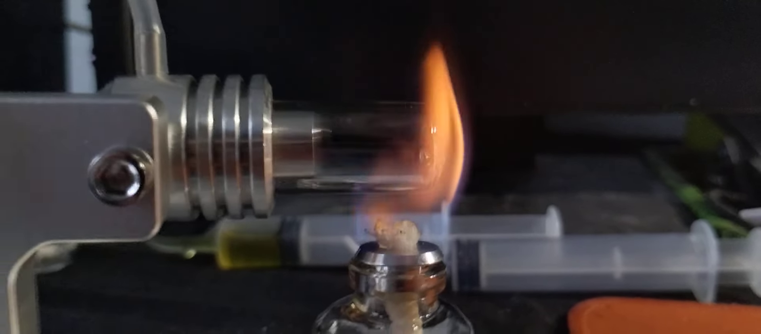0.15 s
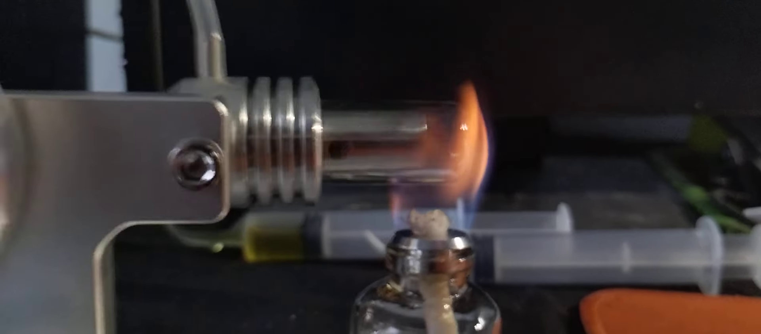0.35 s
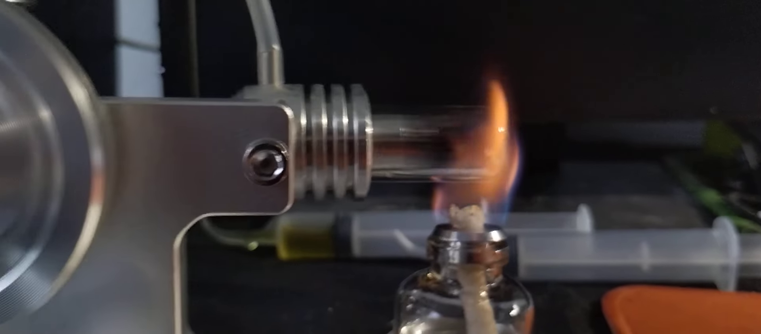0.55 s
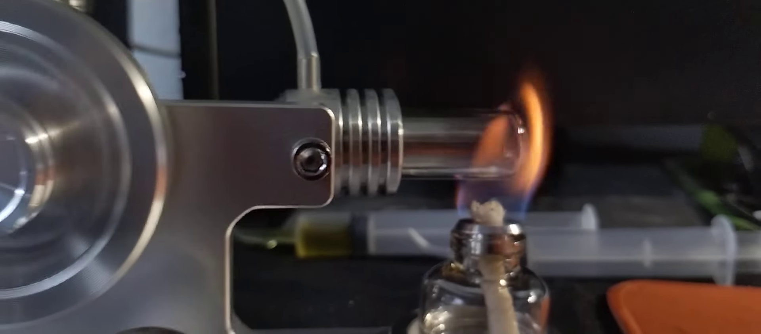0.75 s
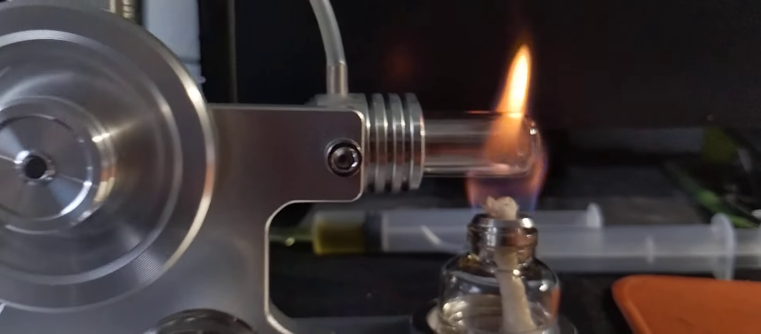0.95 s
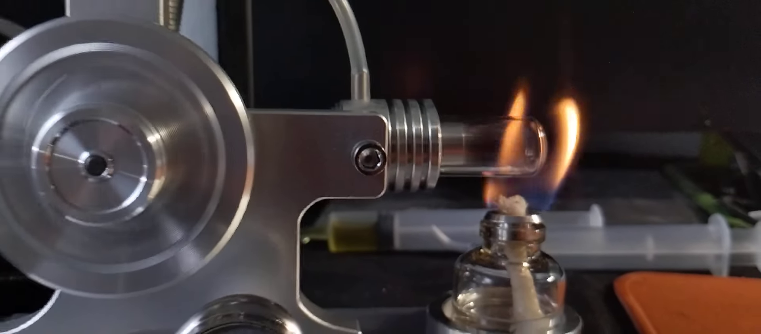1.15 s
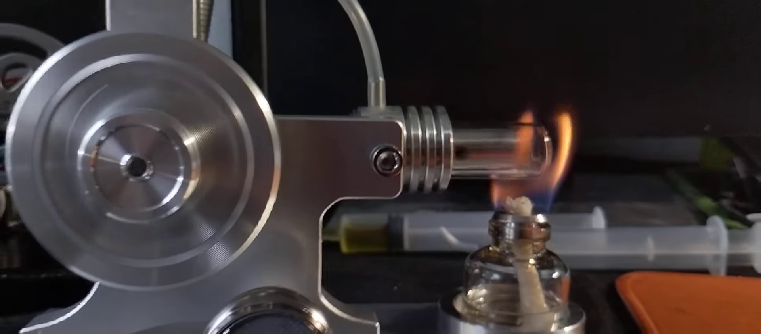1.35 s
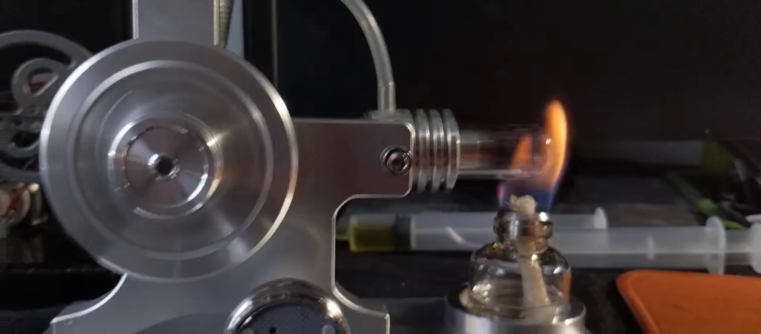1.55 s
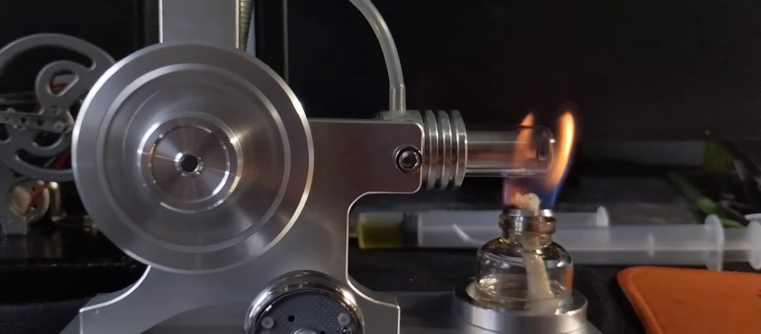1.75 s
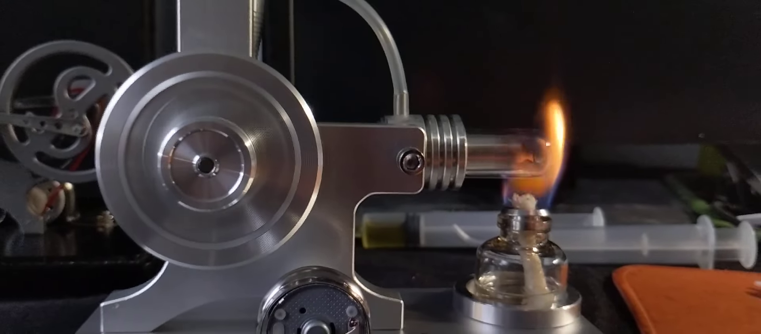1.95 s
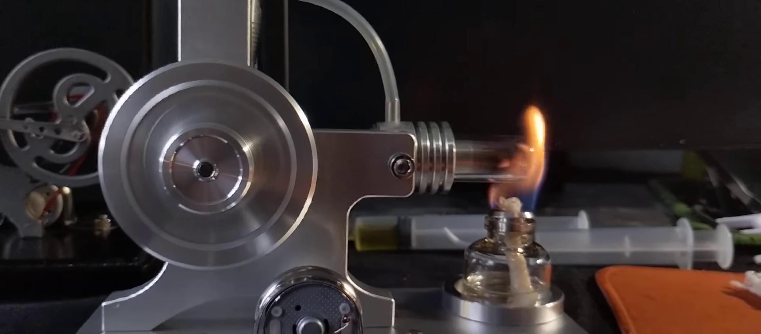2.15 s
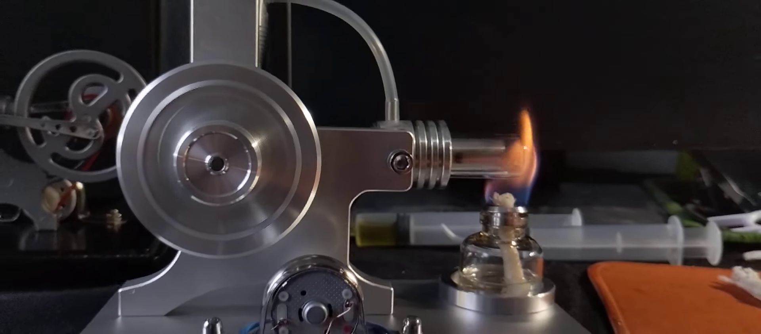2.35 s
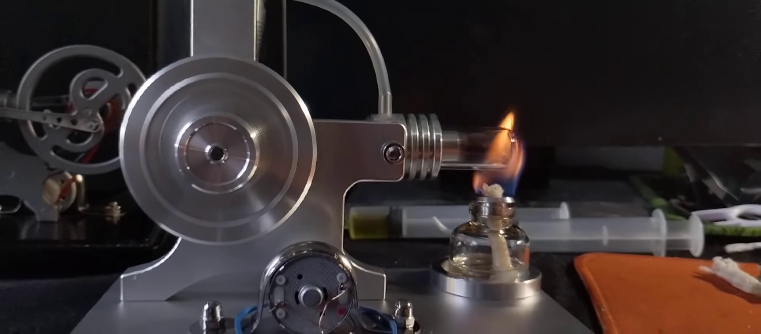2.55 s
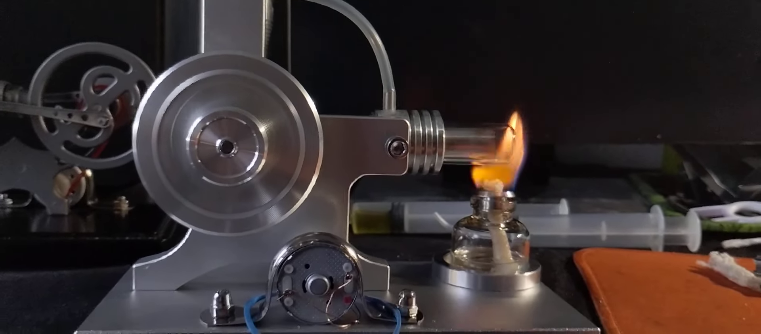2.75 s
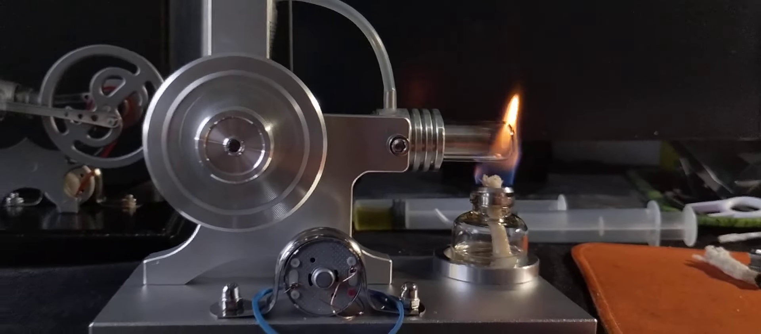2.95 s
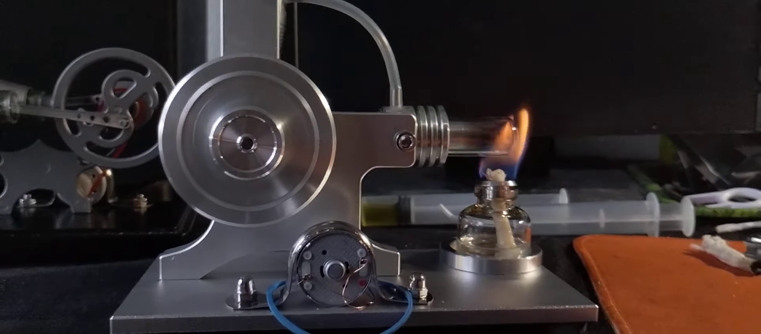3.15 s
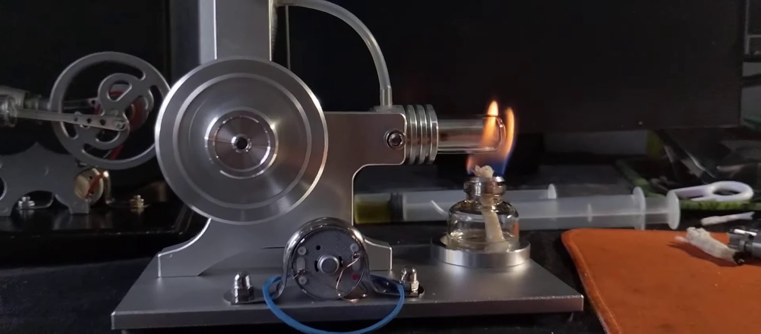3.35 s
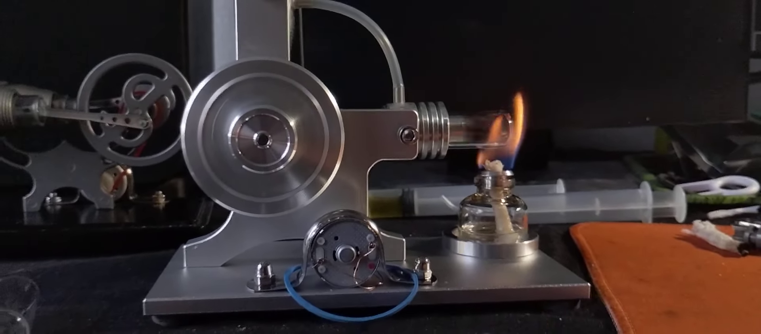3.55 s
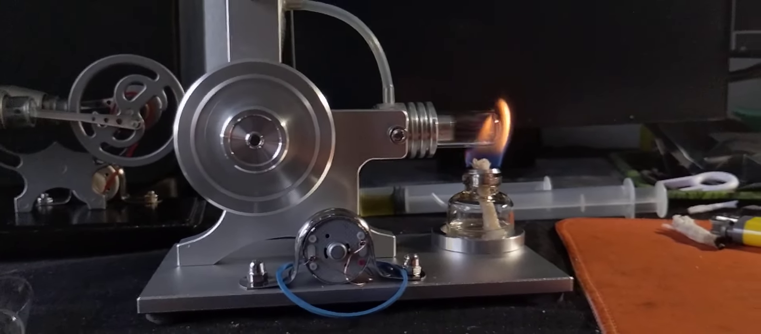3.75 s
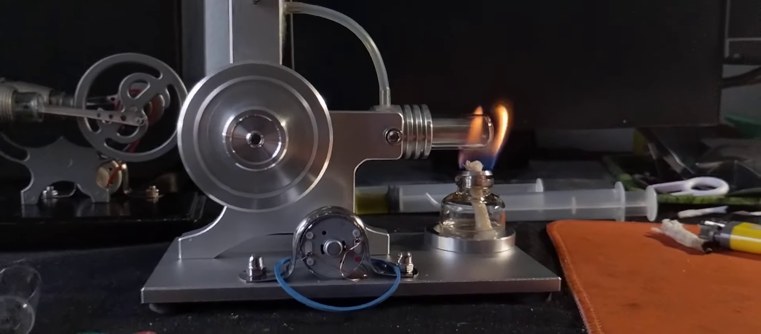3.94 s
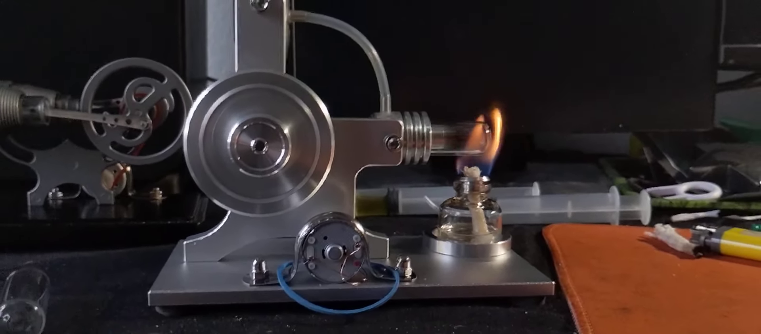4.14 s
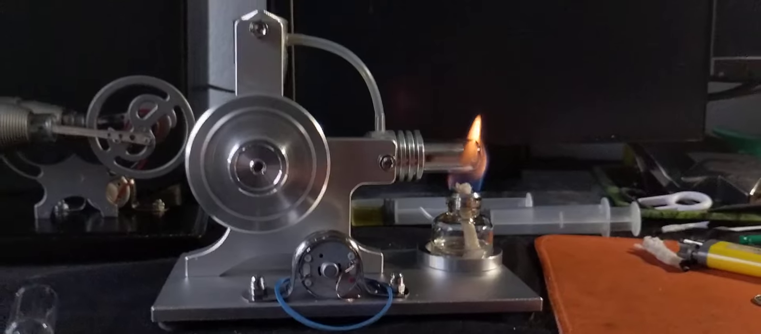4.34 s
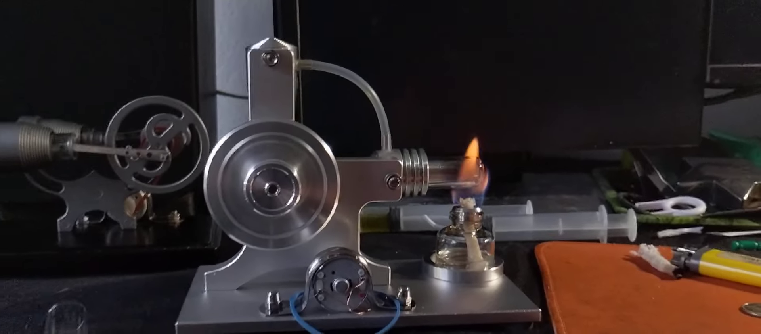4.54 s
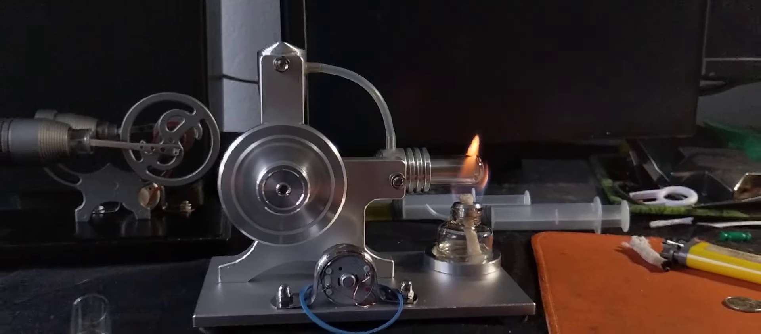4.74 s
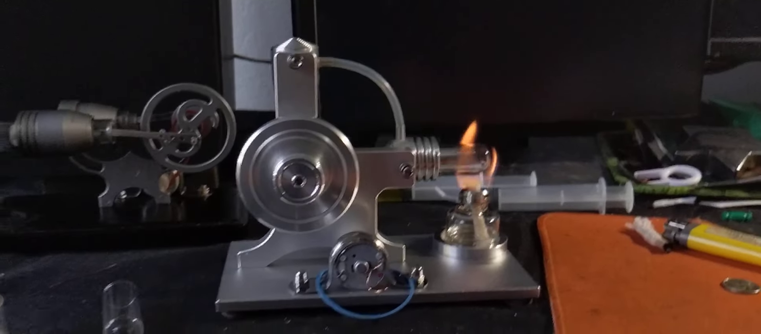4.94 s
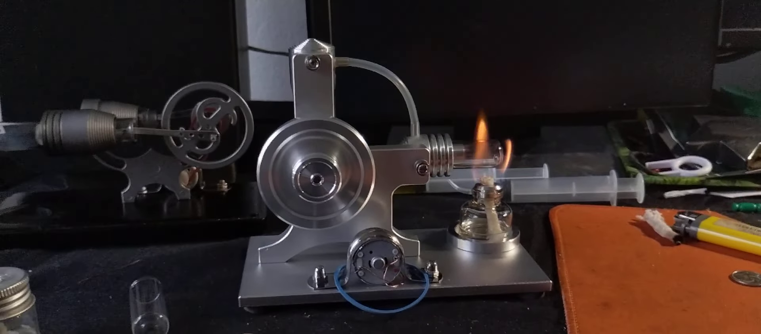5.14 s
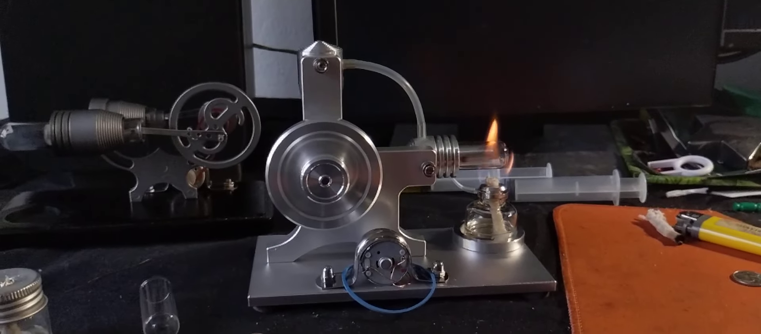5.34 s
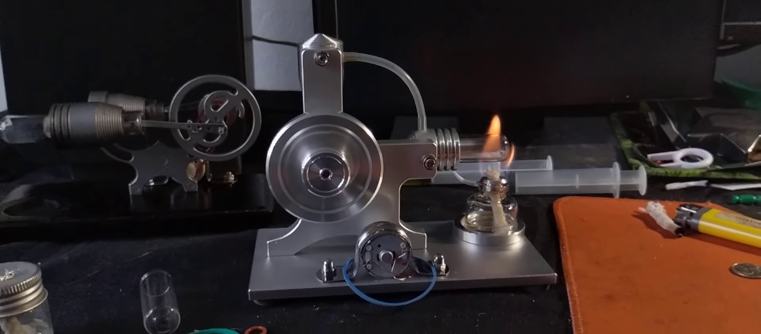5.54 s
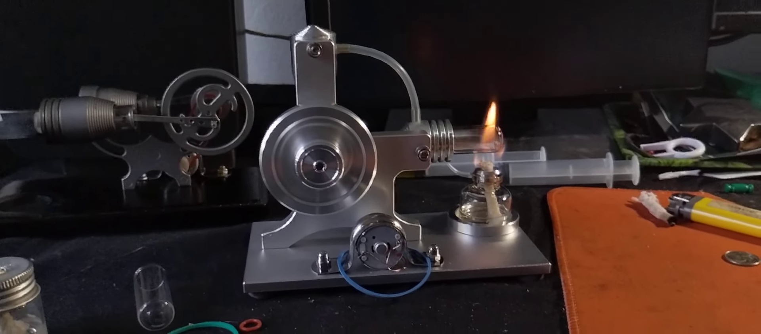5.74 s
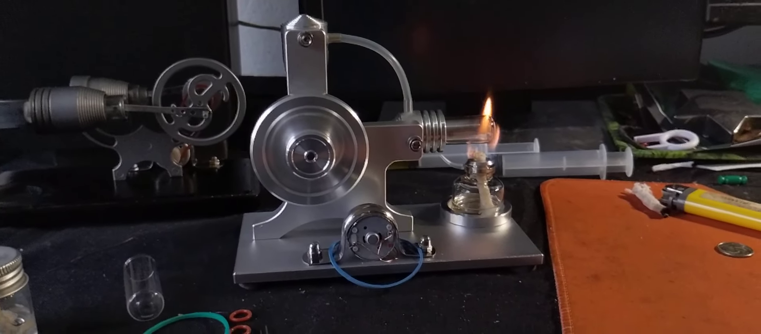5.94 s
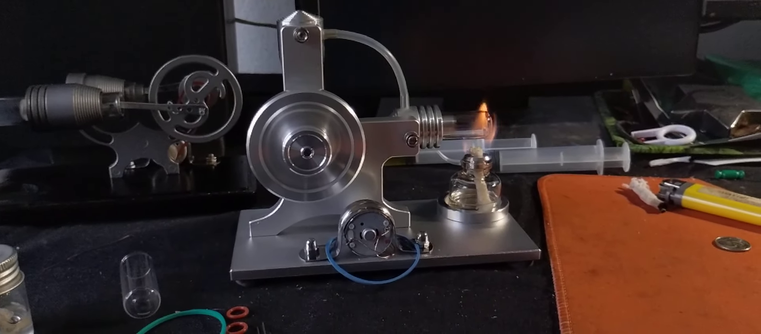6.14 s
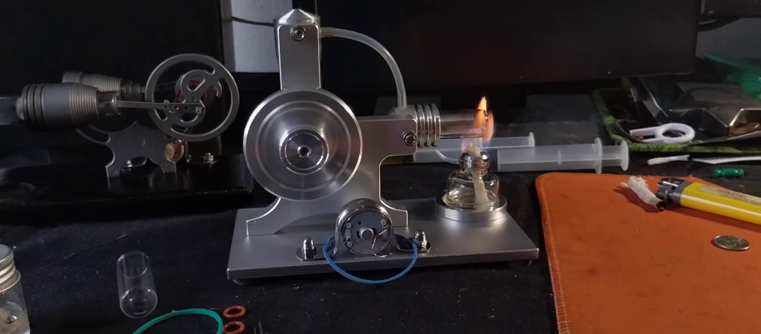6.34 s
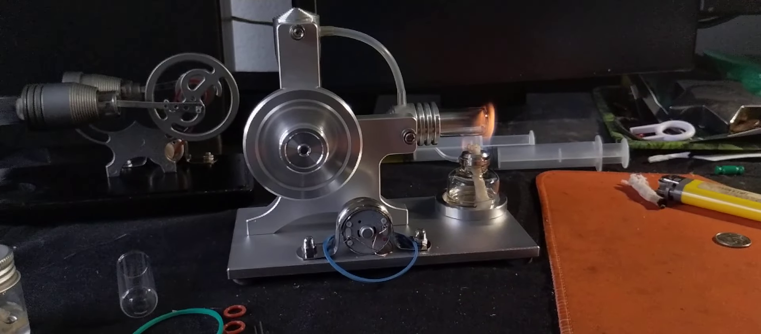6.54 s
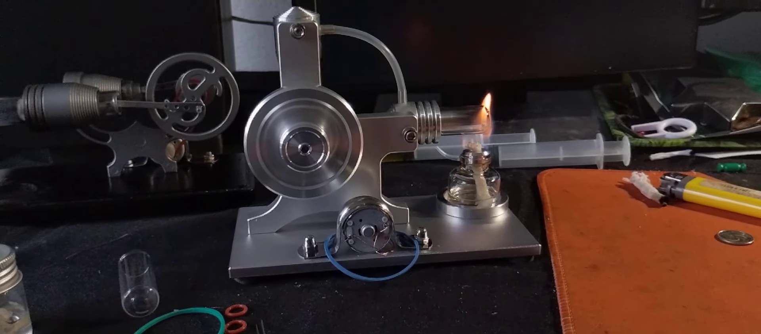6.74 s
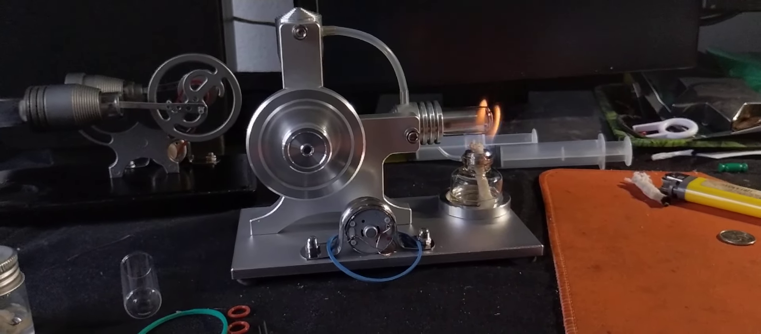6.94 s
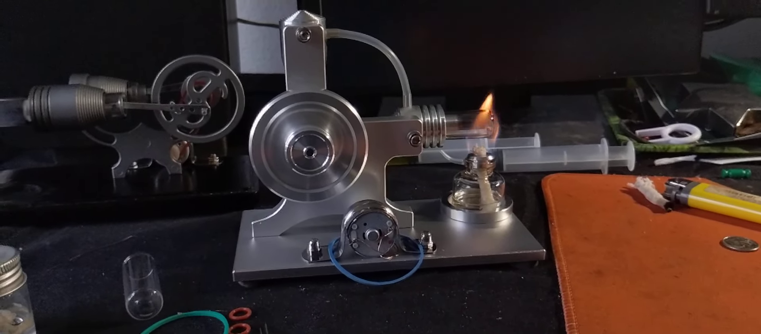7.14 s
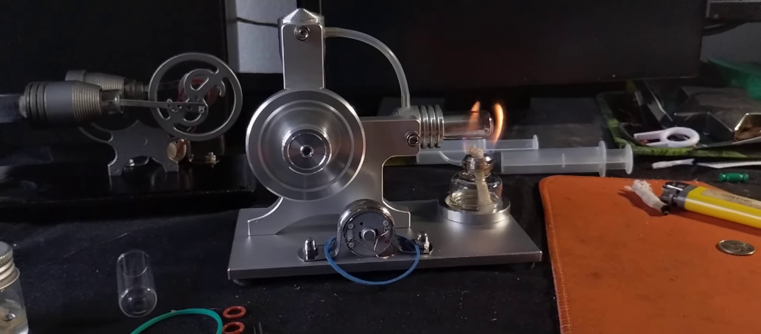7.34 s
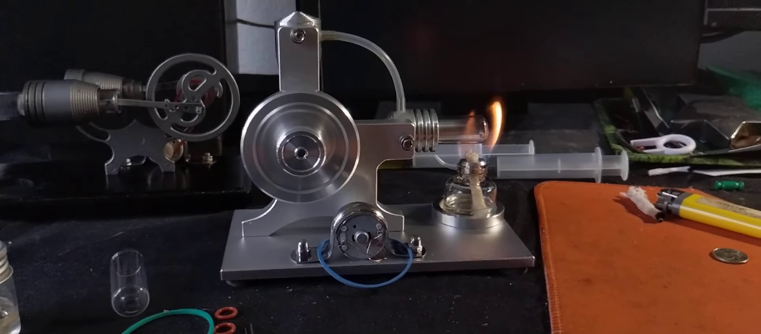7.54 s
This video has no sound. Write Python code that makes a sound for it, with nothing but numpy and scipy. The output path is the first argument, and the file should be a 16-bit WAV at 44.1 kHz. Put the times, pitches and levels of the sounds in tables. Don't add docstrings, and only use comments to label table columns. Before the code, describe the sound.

From 0 s a small metal hot-air engine is already spinning at full speed, close to a handheld stereo phone. Eighteen turns a second, with four tiny knocks each turn, merge into a dense, gritty rattling whir, bright and metallic, with slight unevenness and harder ticks. Flywheel, rods and frame ring in the treble, with fizz on top and a low hum and table rumble below. As the phone backs away, ringing tones shift in colour; a very high whistle swells on the left from about 1.3 to 2.2 s, then drops. Through 3-4.5 s the whole engine gets softer, and the whistle nearly vanishes around 4.7 s. From 5.5 s some shrill ringing returns modestly while the pace stays practically steady, very slightly quickening. The right side remains duller. A short room echo and faint hiss surround it; it is still running when it cuts off near 7.6 s.

```python
import sys
import numpy as np
from scipy import signal
from scipy.fft import rfft, irfft
from scipy.io import wavfile
from scipy.ndimage import uniform_filter1d, map_coordinates

SR = 44100
rng = np.random.default_rng(int(sys.argv[2]) if len(sys.argv) > 2 else 0)


def store_pcm(level_fs):
    pcm = np.round(np.clip(level_fs, -1, 1) * 32767).astype(np.int16)
    wavfile.write(sys.argv[1], SR, np.atleast_2d(pcm).T)


def volts(x):
    e = np.asarray(x, float) / 20
    return 10 ** e


N = 334719
T = np.arange(N) / SR
TURNS_PER_S = 18


def unit(x):
    return x / np.sqrt(np.mean(x ** 2) + 1e-20)


def along(points, hz):
    f, v = np.transpose(points)
    return np.interp(np.log(hz + 1), np.log(f + 1), v)


def curves(rows):
    s, *cols = np.transpose(rows)
    return [np.interp(T, s, c) for c in cols]


def wobble(rate):
    coarse = T[::64]
    knots = rng.standard_normal(int(N * rate / SR) + 4)
    return np.interp(T, coarse, map_coordinates(knots, [coarse * rate]))


def coloured(x, points):
    gain = volts(along(points, np.fft.rfftfreq(4096, 1 / SR)))
    cepstrum = irfft(np.log(gain))
    cepstrum[1:2048] *= 2
    cepstrum[2049:] = 0
    return signal.fftconvolve(x, irfft(np.exp(rfft(cepstrum))))[:N]


# start_s [s], lag [turns]
CRANK_LAG = [
    (0, -0.025),
    (0.25, 0.0),
    (2.25, 0.097),
    (2.9, 0.088),
    (4.25, 0.01),
    (5.25, -0.02),
    (5.75, -0.045),
    (6.25, -0.088),
    (7.6, -0.185),
]


def crank():
    return TURNS_PER_S * T - curves(CRANK_LAG)[0]


# crank_angle [turns], blow_db [dB], chatter_db [dB], chatter_t60_s [s]
KNOCKS = [
    (0.96, -0.5, -22, 0.07),
    (.262, -1, -34.5, 0.038),
    (.553, -2.5, -22.5, 0.032),
    (.772, -2.5, -33, 0.041),
]
# start_s [s], level_db [dB]
UNEVEN_KNOCKS = [(0.515, 7), (0.599, 6), (1.089, -8), (1.28, 5), (1.367, 5), (1.535, 5), (1.591, 5),
                 (1.769, 10), (1.868, 5), (1.892, 3), (2.147, 5), (1.98, 6), (2.019, 7), (2.103, 12),
                 (2.227, 7), (2.631, 7), (2.671, -8), (2.936, 6), (3.114, -8), (3.811, 8), (5.331, -7),
                 (5.486, -15), (5.596, 6), (5.695, 5), (5.818, -8), (6.051, -10), (6.327, 6), (6.752, -9),
                 (2.892, -3), (7.157, 8)]


def reversals(scatter_db, jitter_s, spiky_db, rub_db):
    forces, sizes_db, ages = [], [], []
    uneven_s, uneven_db = np.transpose(UNEVEN_KNOCKS)
    at = np.round(uneven_s * SR).astype(int)
    for angle, blow_db, chatter_db, t60 in KNOCKS:
        turns = crank() + 1 - angle
        turn = turns.astype(int)
        luck = rng.standard_normal((turn.max() + 2, 4))

        size_db = 1.45 * luck[:, 3]
        mine = np.abs(turns[at] - np.round(turns[at])) < .06
        size_db[np.round(turns[at[mine]]).astype(int)] = uneven_db[mine]

        since = (turns - turn) / TURNS_PER_S - jitter_s * np.abs(luck[turn, 0])
        blow = np.diff(since > 0, prepend=True) & (since > 0) & (since < .002)
        chatter = volts(chatter_db + scatter_db * luck[turn, 1] - 60 * since / t60) * (since > 0)
        spikes = uniform_filter1d(rng.standard_normal(N), size=25) * 5
        grit = unit(rng.standard_normal(N) * volts(spiky_db * spikes))
        knock = volts(blow_db + scatter_db * luck[turn, 2]) * blow + chatter * grit
        forces.append(knock + volts(rub_db) * grit)
        sizes_db.append(size_db[turn])
        ages.append(np.abs(since))
    return np.array(forces), np.array(sizes_db), np.array(ages)


def ring(force, modes):
    out = np.zeros((2, N))
    for hz, width_hz, *dbs in modes:
        pole = np.exp((2j * hz - width_hz) * np.pi / SR)
        push = volts(np.array(dbs)) @ force
        swing = signal.lfilter([width_hz ** 1.5], [1, -2 * pole, pole ** 2], push)
        lead = rng.choice([-1, 1]) * np.pi / 2 + .9 * wobble(22)
        out += [swing.imag, (swing * np.exp(1j * lead)).imag]
    return out / out.std(axis=1, keepdims=True)


# start_s [s], distance_loss_db [dB]
RETREAT = [(0, -1), (0.5, -2.5), (1, -4), (2, -6.5), (2.6, -7), (3.5, -10), (4.6, -13), (5.5, -14),
           (6.5, -13.5), (7.2, -13), (7.59, -12)]
HEARD = {"wheel low": (-52, -0.79, -44.5, 0.45), "wheel mid": (-31.5, 1.14, -47, 0.13),
         "wheel high": (-25.5, 1.08, -49, -0.6), "rod low": (-28.5, 0.69, -44, 0.63),
         "rod high": (-35, 2.2, -52.5, 0.4), "link low": (-40.5, 0.5, -47.5, 0.3),
         "link high": (-31.5, 1.5, -41, 0.33), "link top": (-60, 2, -59, -0.3),
         "link pin": (-42, .7, -53, .25), "link cap": (-52, .15, -64, .1), "edge": (-11, 1.3, -10, -1.5),
         "neck": (-11, 1, -17, .9), "shoulder": (-13.5, -0.5, -15, 1), "frame": (-26, 1.1049, -36, .6),
         "fizz": (-27, 1.4, -28, 1.2), "hum": (-35.5, 1.62, -48, 0.86), "rumble": (-40.5, .85, -41, .85)}
# part, centre_s [s], half_width_s [s], left_db [dB], right_db [dB]
BEAMS = [("wheel low", 1.62, 0.25, -30, 3.5), ("wheel low", 2, 0.27, -20, -12),
         ("wheel low", 3.86, 0.38, -9.5, -5), ("wheel low", 4.54, 0.36, 2.4, 4),
         ("wheel low", 5.74, 0.41, 3.9, 6), ("wheel low", 7.1, 0.45, 2.2, .1),
         ("wheel mid", 0, 0.31, 9.5, -2.2), ("wheel mid", .9, 0.31, .1, 8),
         ("wheel mid", 3.23, 1.6, 3.6, 12.2), ("wheel mid", 4.57, 0.14, 2.7, 3.6),
         ("wheel mid", 5.88, 0.42, 3.5, 6.2), ("wheel high", 0.2, 0.37, 5.2, -1.3),
         ("wheel high", 1.96, 0.41, -10, .1), ("wheel high", 2.6, 0.8, 2.4, 4.7),
         ("wheel high", 4.95, 0.56, -2.5, -22), ("wheel high", 7.15, 0.37, 4.6, 1.1),
         ("rod low", .35, .45, -4, -4), ("rod low", 1.78, 0.86, 7.1, 11.3),
              ("rod low", 2.7, 0.63, 2.7, 12), ("rod low", 5.28, 0.27, 4.4, 7.9),
              ("rod low", 7.1, 0.58, 2.2, .1), ("rod high", 0.75, 0.46, 15.7, 13.4),
              ("rod high", 1.5, 0.42, .1, 12), ("rod high", 7.4, 0.62, 16, 5.8),
              ("link top", 5.9, 2.1, 14, 12), ("link pin", 2.9, 1, 7, 9), ("link cap", 6.6, 1.3, 10, 6),
              ("shoulder", 6.3, 1.1, 4.5, 6), ("rod high", 5.6, .6, -3, .1), ("link high", 6, 1.24, -4, -7),
              ("link low", 2.85, 0.87, -6, -2), ("link high", 3.35, 1.3, 5.6, 5.1),
              ("frame", 3.9, 1, 0.63, 2.1), ("neck", 0.56, 0.51, 8.7, .1), ("fizz", 0, 0.26, -4.5, 0),
              ("fizz", 4.5, 0.66, 4, 0), ("fizz", 7, 0.2, -2, 0), ("hum", 1.6, 1.3, 2.2, 1.5),
              ("rumble", .7, 0.3, 6, 0), ("rumble", 4.25, .55, 2.3, 0)]


def heard(part):
    left_db, left_share, right_db, right_share = HEARD[part]
    loss_db = np.outer([left_share, right_share], curves(RETREAT)[0])
    level_db = np.array([[left_db], [right_db]]) + loss_db
    for name, s, width_s, *dbs in BEAMS:
        if name == part:
            level_db = level_db + np.outer(dbs, np.exp(-((T - s) / width_s) ** 2))
    return level_db


# pitch_hz [Hz], width_hz [Hz], level_db [dB] at each of the four reversals
WHEEL = [
    (2112, 107, -9, -10, -9, -2.2),
    (3482, 150, -12, -10, -4.5, -1.2),
    (6305, 164, -2, -26, -8, -1.8),
]
# pitch_hz [Hz], width_hz [Hz], level_db [dB] at each of the four reversals
RODS = [
    (4450, 150, -2.5, -6, -0.87, 0.062),
    (7820, 155, -15, -5, -1.1, 0),
]
# pitch_hz [Hz], width_hz [Hz], level_db [dB] at each of the four reversals
LINKS = [
    (2625, 180, 0, -8, 0, -3),
    (3920, 200, -10, -9, 0, -8),
    (4800, 140, -3, -9, 0, -2),
    (4270, 150, -4, -9, 0, -3),
    (6760, 320, 0, -12, -3, -2),
]


def wheel_and_rods(force):
    parts = 0
    for part, mode in zip(HEARD, WHEEL + RODS + LINKS):
        parts = parts + volts(heard(part) - 0.25) * ring(force, [mode])
    return parts


# pitch_hz [Hz], width_hz [Hz], level_db [dB] at each of the four reversals
CYLINDER = [
    (8815, 140, 0, -9, 0, 1.5),
    (9700, 160, -14, -26, -19, -18),
    (8430, 200, -19, -30, -21, -21),
    (9080, 400, -11, -24, -11, -12),
]
# start_s [s], level_db [dB], left_over_right_db [dB]
WHISTLE_HEARD = [(0.0, -54, 17), (0.15, -36, 14), (1.06, -31, 23.0), (1.39, -23, 28.0), (1.48, -24.5, 23),
                 (1.88, -23.5, 34.0), (1.94, -25.5, 26.0), (1.99, -22.5, 31.5), (2.39, -31.5, 28.5),
                 (4.25, -36, 33.5), (4.69, -50, 28), (5.64, -33, 22.5), (6.02, -38, 20), (6.34, -36, 18),
                 (6.85, -37, 20), (7.14, -32.5, 21), (7.5, -34.5, 21), (7.59, -33.5, 20.5)]


def cylinder(struck):
    sound = ring(struck, CYLINDER[:1])
    for part, mode in zip(("edge", "neck", "shoulder"), CYLINDER[1:]):
        rough = struck * rng.choice([-1, 1], size=N)
        sound = sound + volts(heard(part)) * ring(rough, [mode])
    level_db, lean_db = curves(WHISTLE_HEARD)
    return volts(np.array([level_db + 4.0, level_db - lean_db + 2.5])) * sound


# pitch_hz [Hz], width_hz [Hz], level_db [dB] at each of the four reversals
FRAME = [(1984, 240, -10.5, -13, -11, -7), (5520, 560, 0, -7, -2, .5), (6920, 110, -8, -19, -12.5, -9)]
# pitch_hz [Hz], level_db [dB per Hz]
CLATTER_LEFT = [(150, -42), (400, -5.5), (900, -2), (1600, -5.5), (2200, -34), (3000, 2.5), (4200, 1),
                (4950, -22.5), (5600, 3.5), (7000, 4), (9000, 11.5), (10300, 3), (11500, -34),
                (15000, -16.5)]
# pitch_hz [Hz], level_db [dB per Hz]
CLATTER_RIGHT = [(150, -42.5), (400, -3.5), (900, -8), (1600, -9), (2200, -9.5), (3000, -6), (4200, 4.5),
                 (4950, -2.5), (5600, 4), (6500, 3.5), (7300, -24), (8600, 3), (9600, -45.5),
                 (11000, -46.5), (15000, -51.5)]


def frame_and_clatter(force):
    total = force.sum(axis=0)
    other_faces = total * rng.choice([-1, 1], size=N)
    slide = volts(-33.5) * rng.standard_normal((2, N))
    left = unit(coloured(total + slide[0], CLATTER_LEFT))
    right = unit(coloured(0.27 * total + other_faces + slide[1], CLATTER_RIGHT))
    clatter = volts([[4], [2.5]]) * np.array([left, right])
    return volts(heard("frame")) * (ring(force, FRAME) + clatter)


# pitch_hz [Hz], level_db [dB per Hz]
FIZZ = [(8000, -25), (10000, 9.5), (11000, 2.5), (14300, 2)]
# pitch_hz [Hz], width_hz [Hz], level_db [dB] at each of the four reversals
FINS = [
    (11820, 240, -0.5, -21, -11, -10),
    (12350, 280, 4, -4, 2, 0),
]


def fizz(force):
    faces = force.sum(axis=0) * rng.choice([-1, 1], size=N)
    hiss = unit(coloured(faces + volts(5.0 - 33.5) * rng.standard_normal(N), FIZZ))
    sound = hiss * volts(1.3 * wobble(7.3)) + volts(-9) * ring(force, FINS)[0]
    return volts(heard("fizz")[0] + 1.5) * sound


# start_s [s], level_db [dB]
LAST_KNOCK = [
    (0, 2),
    (1.1, 1.5),
    (1.5, -1),
    (2.4, -3),
    (3, 1),
    (5, 2.5),
    (7.59, 3),
]
# pitch_hz [Hz], level_db [dB]
DULL_RIGHT = [(1000, 1), (9000, -1.5), (9800, -6), (11000, -24.5)]


def linkage():
    even, size_db, age = reversals(scatter_db=0.87, jitter_s=.0003, spiky_db=2.5, rub_db=-40.0)
    force = even * volts(0.3 * size_db - 81 * age)
    size_db[-1] += curves(LAST_KNOCK)[0]
    struck = even * volts(size_db - 344 * age)
    left, right = wheel_and_rods(force) + cylinder(struck) + frame_and_clatter(force)
    return np.array([left + fizz(force), coloured(right, DULL_RIGHT)])


# pitch_hz [Hz], t60_s [s]
WALLS = [
    (200, 0.29),
    (2000, 0.48),
    (10000, 0.065),
]


def walls(x):
    hz, t, z = signal.stft(rng.standard_normal((2, SR // 3)), SR, nperseg=256)
    decay = volts(-60 * t / along(WALLS, hz)[:, None])
    tail = signal.istft(z * decay, SR, nperseg=256)[1]
    return signal.fftconvolve(x, tail / np.linalg.norm(tail[0]), axes=1)[:, :N]


# order [multiple of the shaft rate], level_db [dB]
HUM = [(2, -25), (3, -20), (4, -15), (6, -3.5), (7, -20), (9, -10), (11, -13.5), (12, -19), (13, -7.5),
       (14, -10), (15, 0), (16, -6), (17, -8), (18, -13), (21, -14.5), (23, -14)]
# pitch_hz [Hz], level_db [dB per Hz]
RUMBLE = [(30, -21), (60, -5), (100, 7), (160, 6.5), (220, -1.5), (350, -38.5)]


def base():
    hum_db, rumble_db = heard("hum"), heard("rumble")[0]
    hum, turns = 0, crank()
    for order, db in HUM:
        level_db = np.array([rumble_db] * 2) if order < 12 else hum_db
        swell_db = 1.8 * wobble(6)
        phase = order * turns + rng.random() + 0.047 * wobble(8.3)
        hum = hum + volts(level_db + db + 1.03 + swell_db) * np.sin(2 * np.pi * phase)
    a = unit(coloured(rng.standard_normal(N), RUMBLE))
    b = unit(coloured(rng.standard_normal(N), RUMBLE))
    rumble = np.array([a + 0.66 * b, a - 0.3 * b])
    return hum + volts(rumble_db - 3.0 + 1.3 * wobble(8)) * rumble


# pitch_hz [Hz], level_db [dB per Hz]
ROOM_LEFT = [(25, -84), (60, -83), (200, -81), (500, -80), (1100, -76.5), (1600, -75), (2100, -65),
             (3000, -76), (5000, -64), (8000, -97), (11000, -73), (14300, -86)]
# pitch_hz [Hz], level_db [dB per Hz]
ROOM_RIGHT = [(25, -86), (60, -78.5), (200, -78), (500, -83.5), (1100, -71), (1600, -79), (2100, -68.5),
              (3000, -73), (5000, -86.5), (7000, -70), (9500, -100), (11000, -110), (14300, -100)]


def room_tone():
    shared = coloured(rng.standard_normal(N), [(300, -3.0), (1500, -12), (4000, -38.5)])
    left = coloured(shared + 0.47 * rng.standard_normal(N), ROOM_LEFT)
    right = coloured(shared + 0.47 * rng.standard_normal(N), ROOM_RIGHT)
    return np.sqrt(SR / 2) * np.array([left, right])


def scene():
    engine = linkage()
    return volts(0.78) * engine + volts(-11) * walls(engine) + base() + room_tone()


# pitch_hz [Hz], level_db [dB]
MUTE = [(1500, -16), (2300, -11), (2900, -8.3), (3900, -7.3), (5000, -11), (9000, -18), (11500, -6.5),
        (14000, -6)]


def muted(x):
    top_hz, spill_db_per_khz, sharp_db = 14300, -40, 6
    hz, _, z = signal.stft(x, SR, nperseg=2048)
    above = hz[:, None] >= top_hz
    slope = volts(spill_db_per_khz * (hz[:, None] - top_hz) / 1000)
    spill = signal.istft(z * above * slope, SR, nperseg=2048)[1]
    quick = uniform_filter1d(spill[0, :N] ** 2, size=128)
    slow = uniform_filter1d(quick, size=2048)
    sharp = uniform_filter1d(1. * (quick > volts(sharp_db) ** 2 * slow), size=256)

    power = np.abs(z[:, :1024]) ** 2
    band = np.repeat(power.reshape(2, 128, 8, -1).mean(axis=2), 8, axis=1)
    around = uniform_filter1d(power.sum(axis=0), size=110, axis=0)
    low_hz = hz[:1024, None]
    bar = around * volts(2 * along(MUTE, low_hz))
    loud_enough = (band > bar) & (band.sum(axis=0) > 1.7 * bar)
    z[:, :1024] *= loud_enough | (low_hz < 1500)
    kept = signal.istft(z * ~above, SR, nperseg=2048)[1][:, :N]
    return kept + 2 * sharp * spill[:, :N]


def low_pass(x):
    return signal.sosfilt(signal.butter(12, 15350, fs=SR, output="sos"), x)


def record(dry):
    ceiling = .85
    held = dry / (1 + np.abs(dry / ceiling) ** 6) ** (1 / 6)
    return low_pass(muted(held))


dry = scene()
out = record(dry)
store_pcm(out)
```